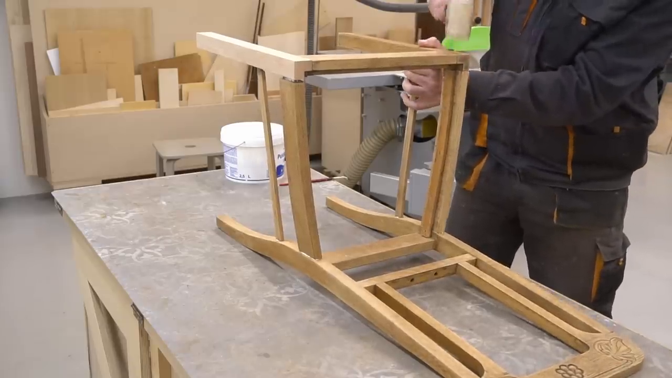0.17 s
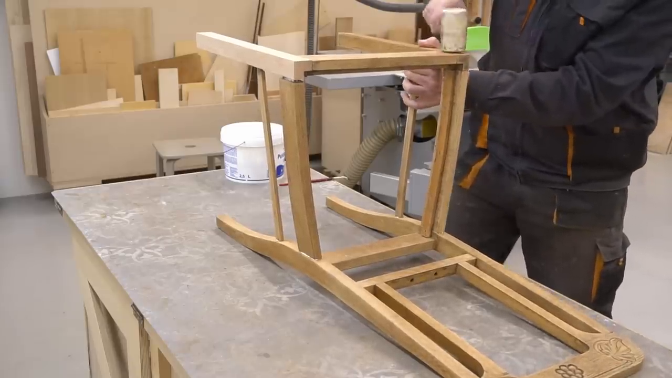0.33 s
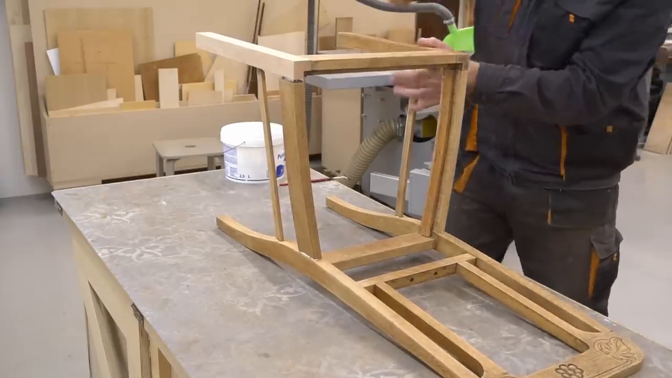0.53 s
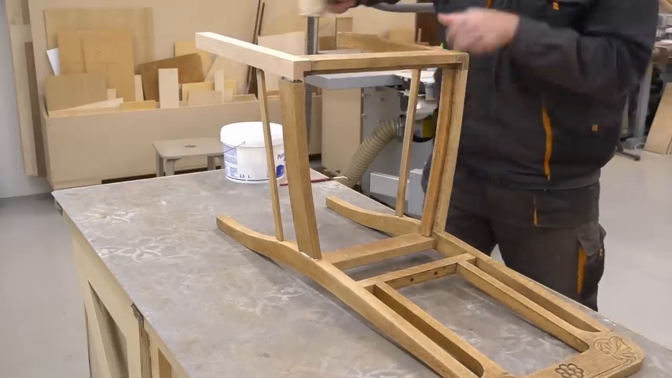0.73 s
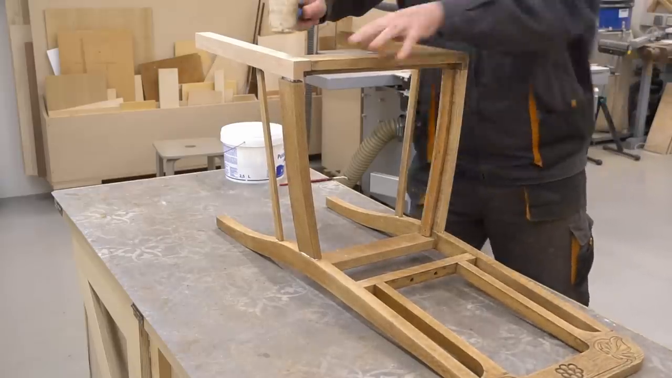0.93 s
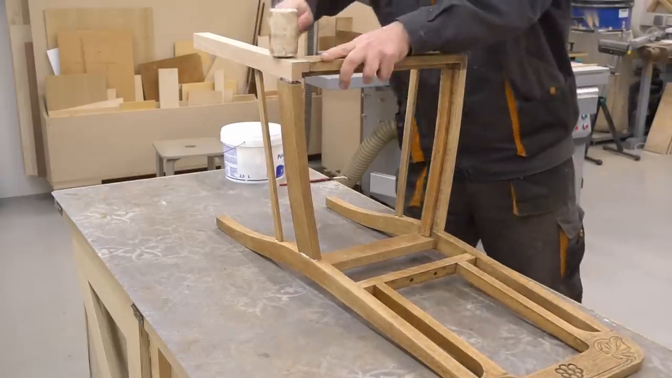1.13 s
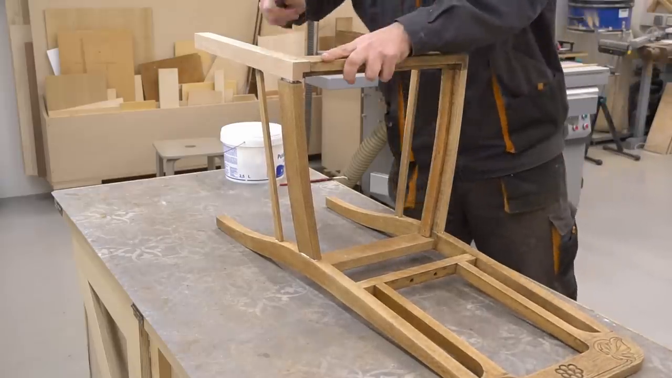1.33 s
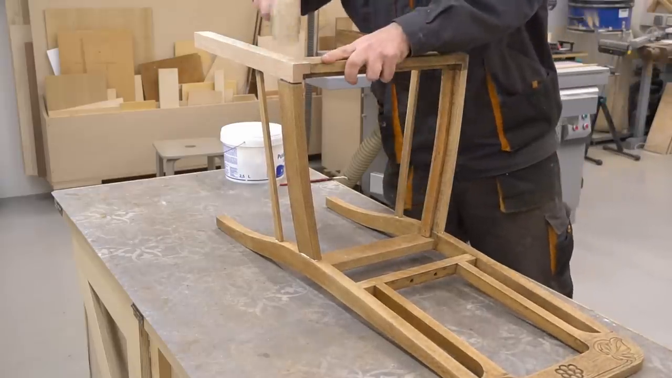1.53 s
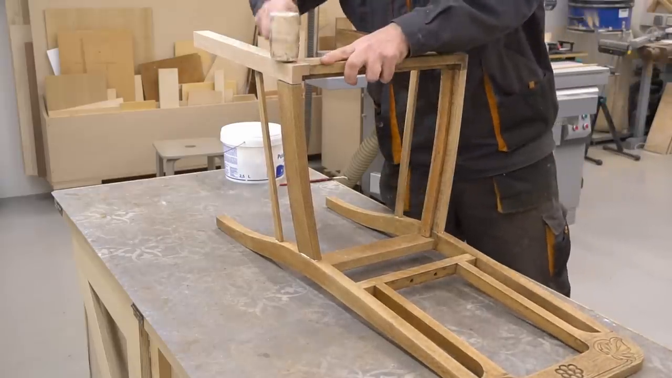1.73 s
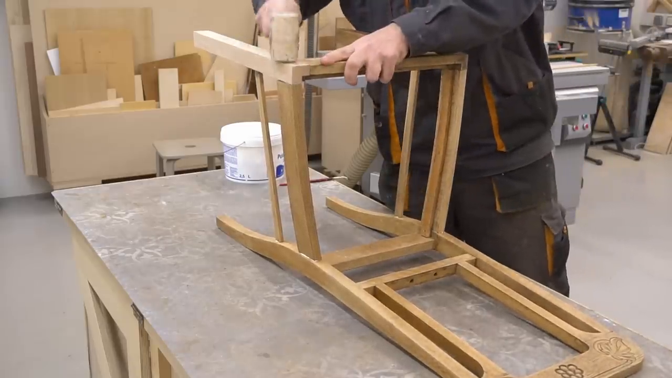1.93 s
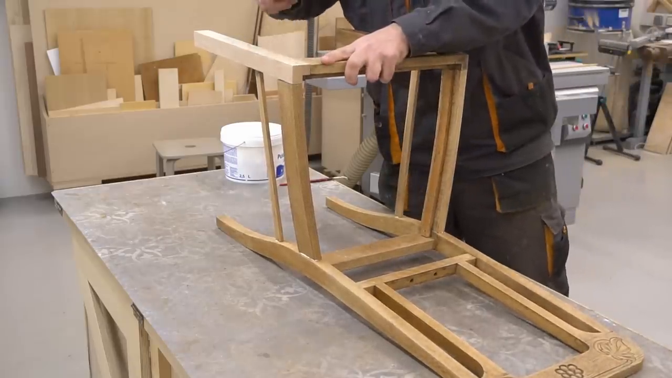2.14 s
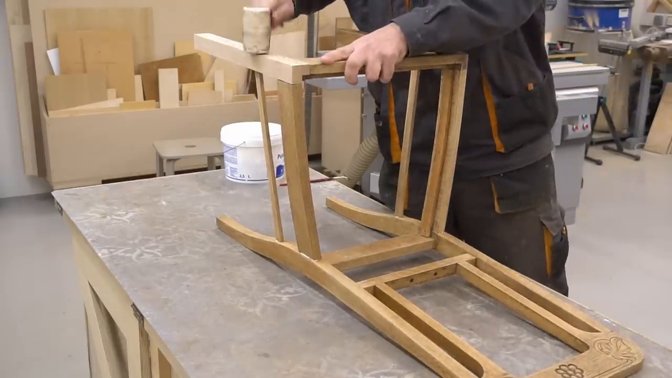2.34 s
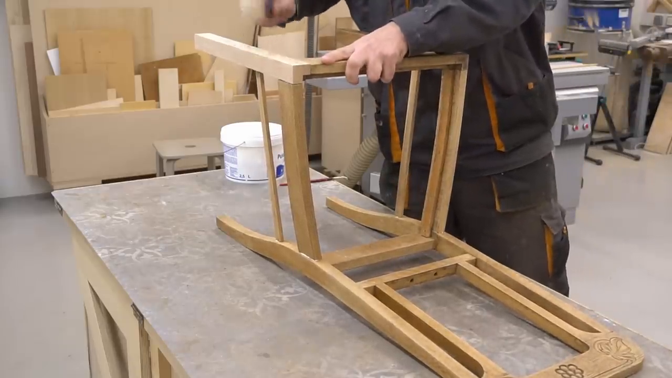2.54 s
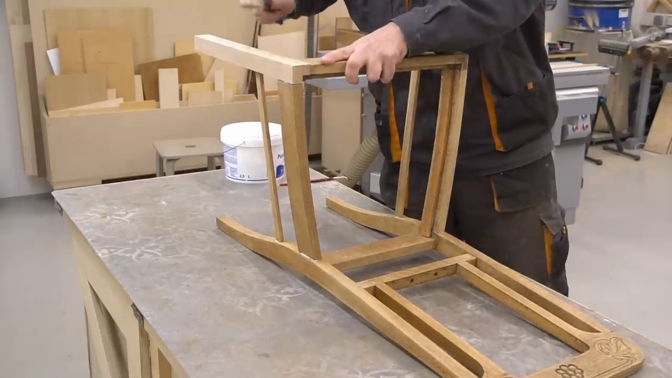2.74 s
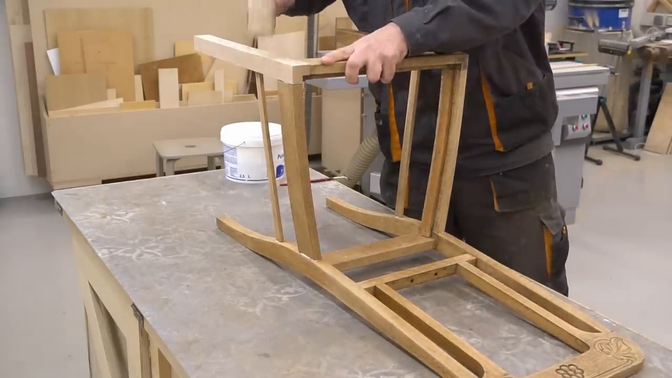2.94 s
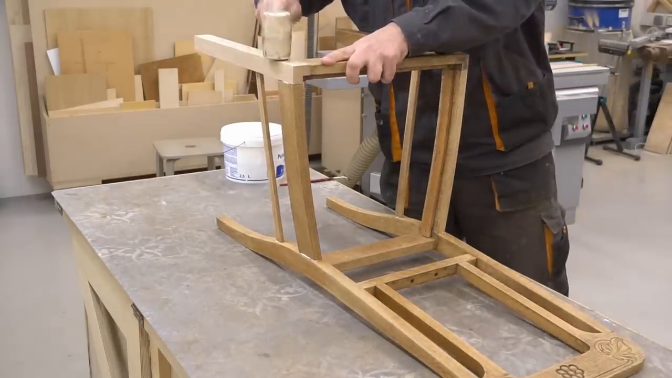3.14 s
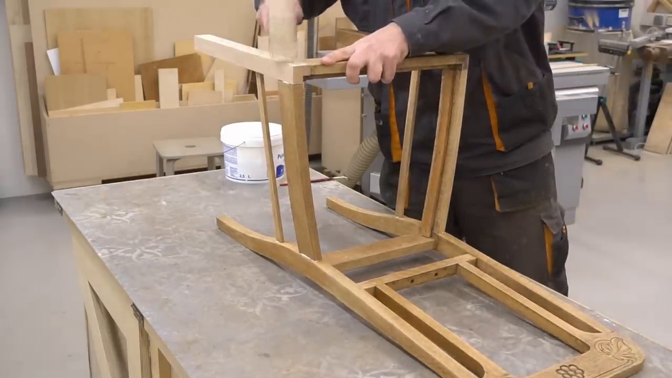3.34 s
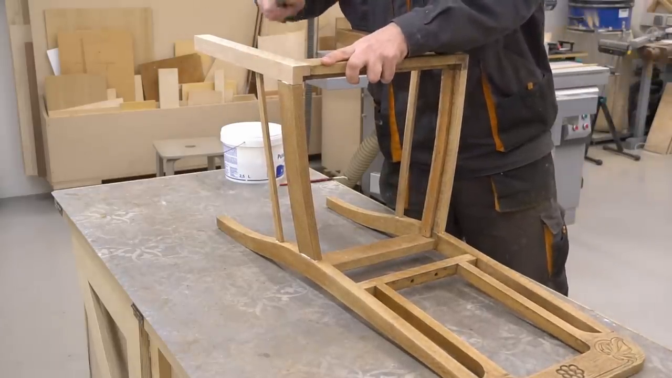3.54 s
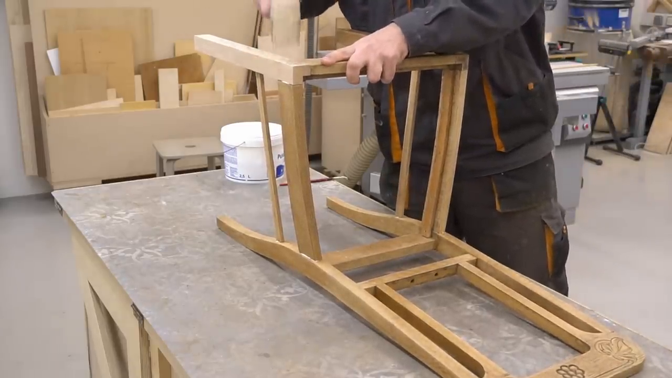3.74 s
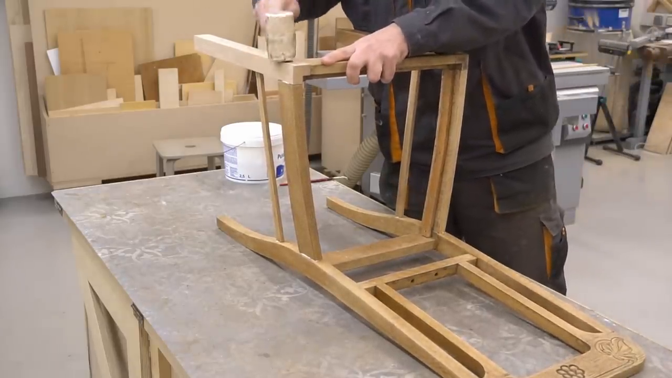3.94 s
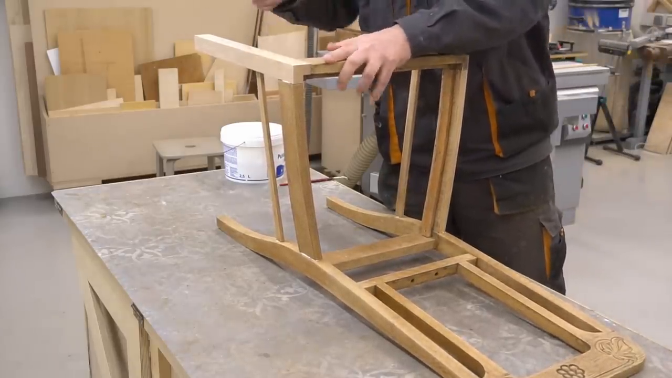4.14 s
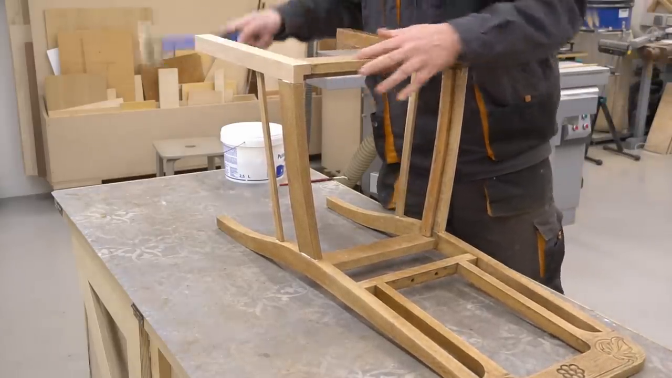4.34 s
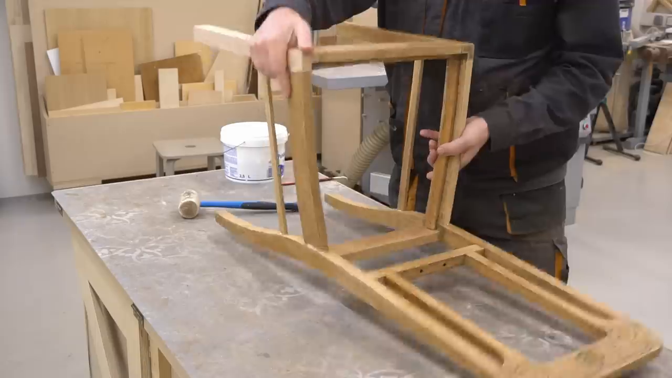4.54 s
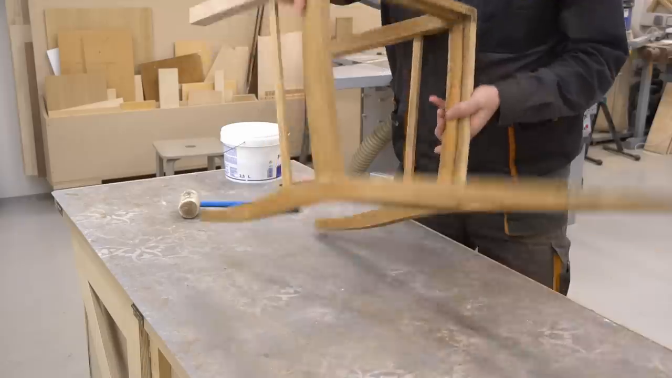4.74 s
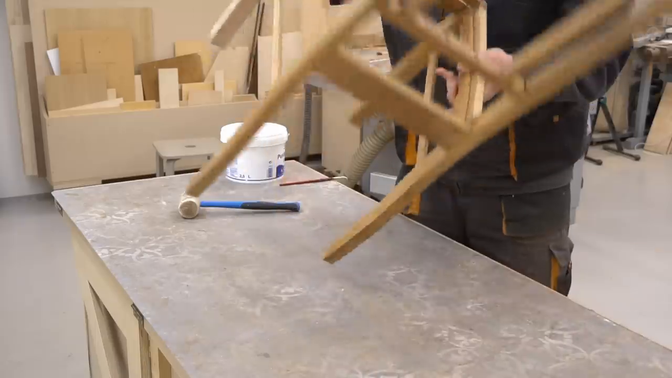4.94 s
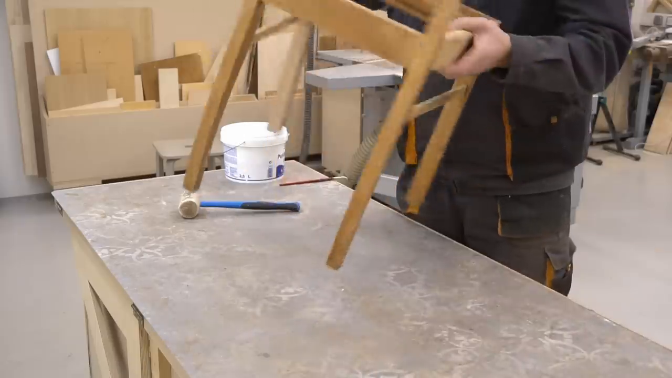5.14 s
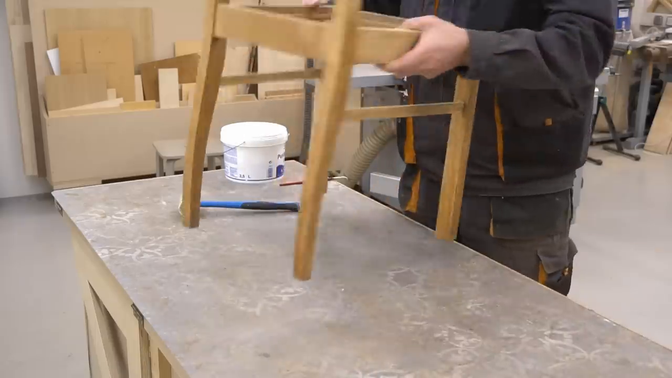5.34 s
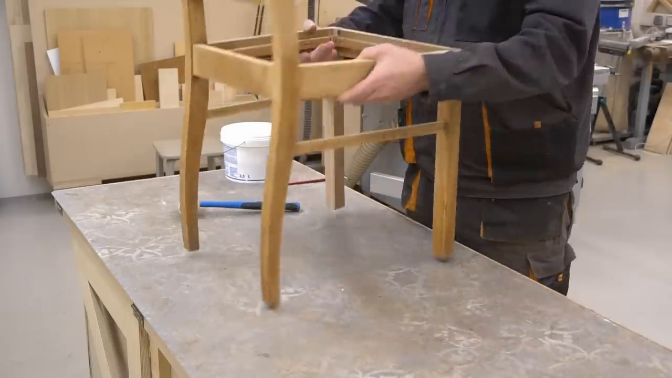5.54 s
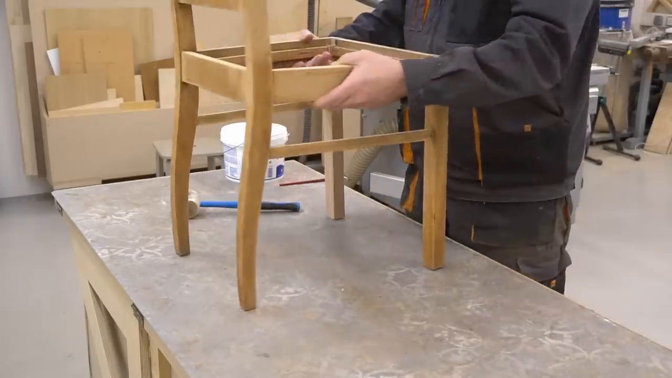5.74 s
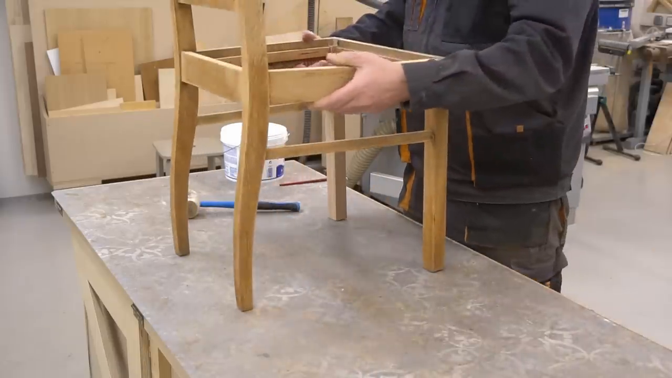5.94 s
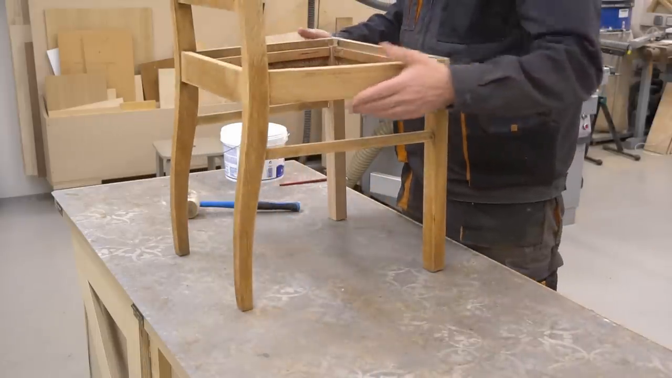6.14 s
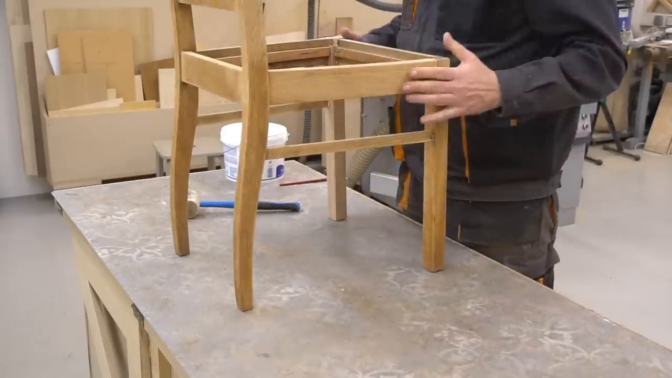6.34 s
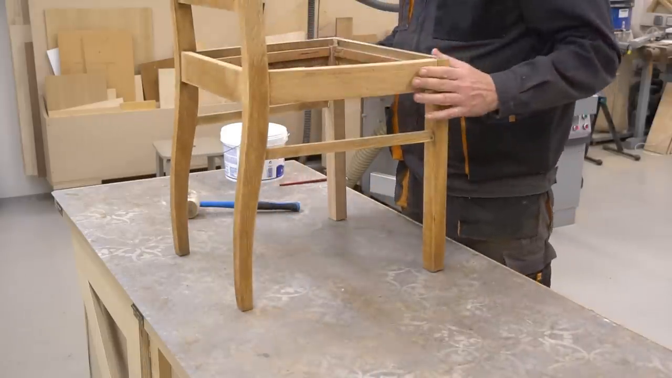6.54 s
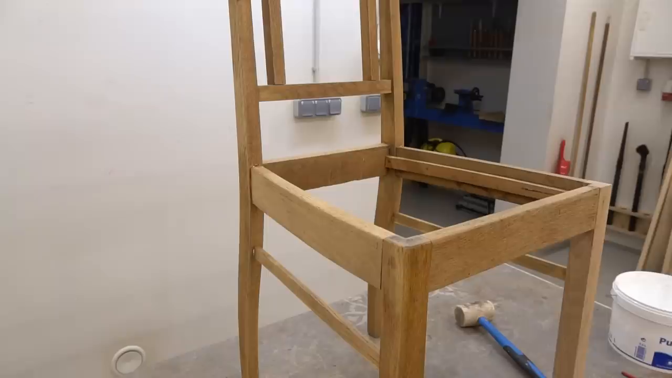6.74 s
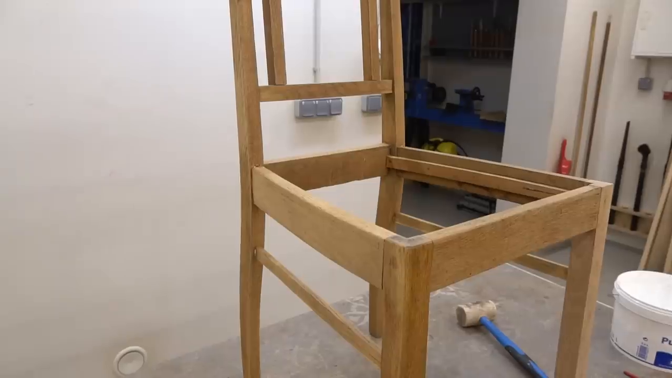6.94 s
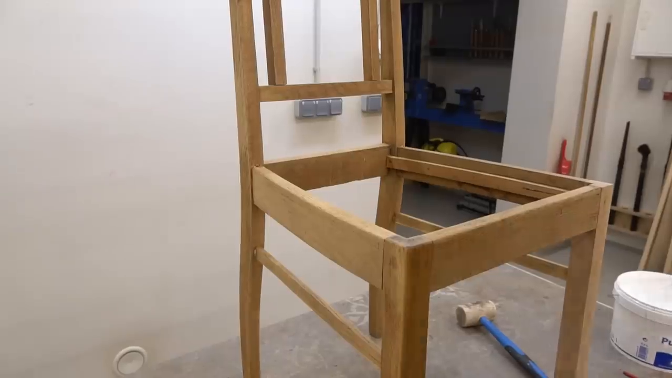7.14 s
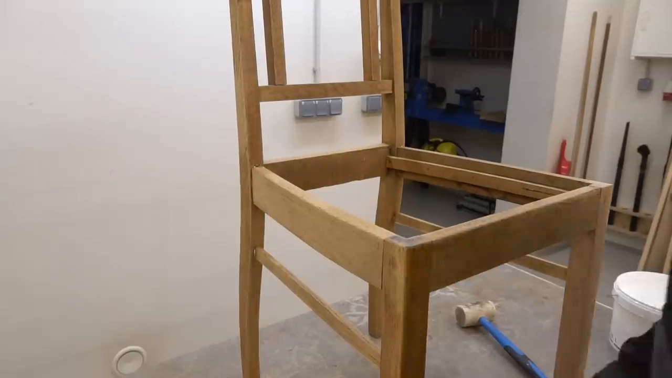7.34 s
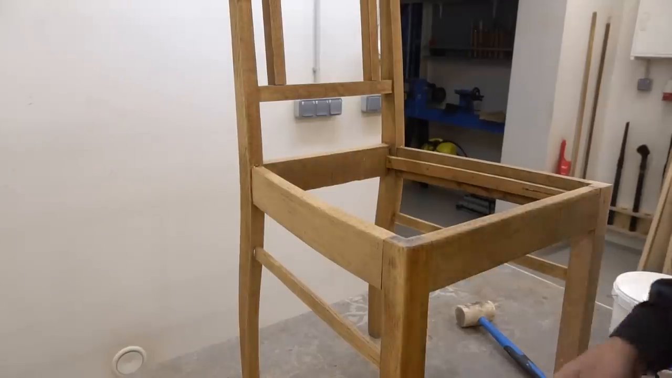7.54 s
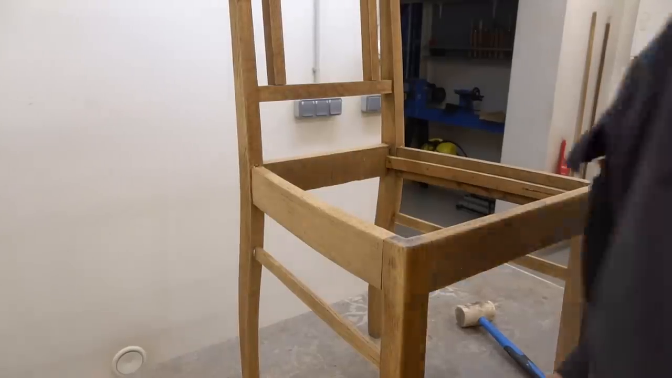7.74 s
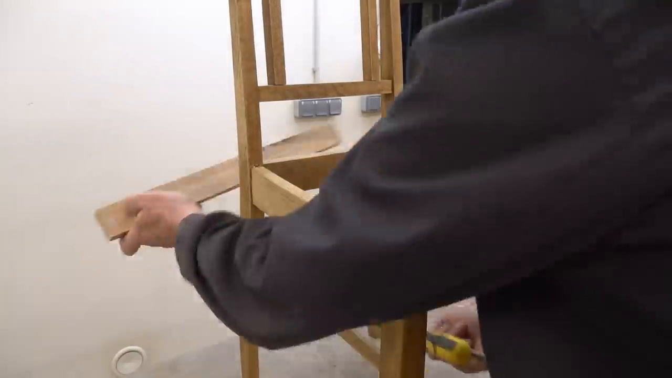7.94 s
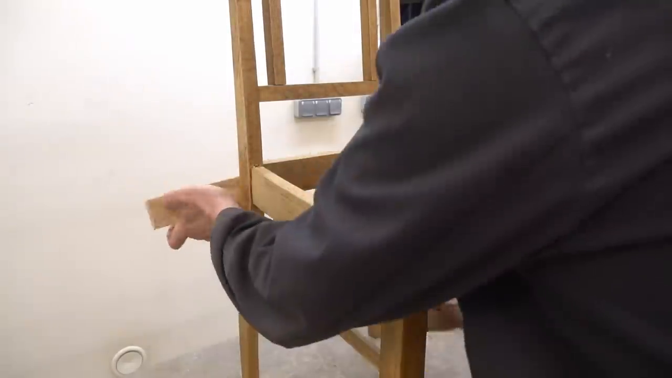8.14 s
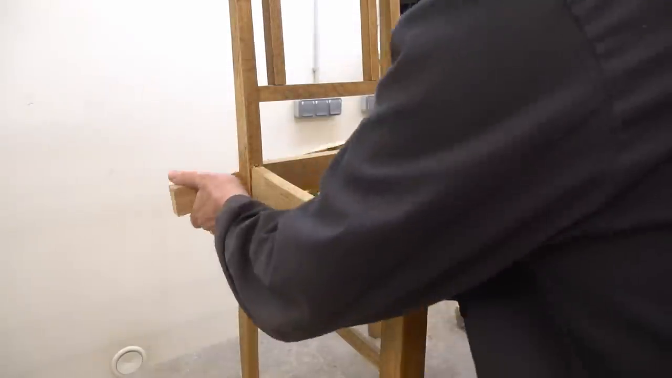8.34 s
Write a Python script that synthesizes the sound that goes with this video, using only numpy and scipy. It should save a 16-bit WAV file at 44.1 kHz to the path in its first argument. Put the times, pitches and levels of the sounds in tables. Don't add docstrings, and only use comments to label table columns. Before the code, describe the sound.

Mallet blows on a chair frame, some way from the microphone, each a sharp crack with hollow wooden ring, bench boom and swelling room echo. Quiet handling follows: a small tick, hand rubbing, faint squeaks and a cluster of leg taps. After a tiny silent cut the sound is near and drier: cloth rustle, soft soles, bright plasticky rattling, then one heavy wood knock, bounce and drag.

```python
import sys
import numpy as np
from scipy import signal
from scipy.fft import rfft, irfft, next_fast_len
from scipy.io import wavfile
from scipy.ndimage import minimum_filter1d

SR = 44100
rng = np.random.default_rng(int(sys.argv[2]) if len(sys.argv) > 2 else 0)


def invert_db(x):
    u = np.asarray(x, float) / 20
    return 10 ** u


def store_wav(level_fs):
    pcm = np.round(np.clip(np.atleast_2d(level_fs), -1, 1) * 32767)
    wavfile.write(sys.argv[1], SR, pcm.T.astype(np.int16))


N = 369979

# start_s, blow_db, crack_db, thud_db, brightness_db
EARLY_BLOW = [
    (-0.14, -13, 1, -7, -14),
]
FAR_BLOWS = [
    (0.107, -18, -10.5, -3.5, 0.5),
    (0.316, -19, -9.5, -0.5, 3.5),
]
TOUCH_BLOW = [
    (1.131, -36.5, -10, 0, -4),
]
RAIL_BLOWS = [
    (1.461, -25.5, -12, -15.5, -6),
    (1.746, -21.5, -10, -2, 1.5),
    (1.984, -26.5, -3.5, 5.5, 1.5),
    (2.321, -24, -5.5, 1, -2),
]
REBOUND_BLOW = [
    (1.498, -21.5, -25, -4, -2),
]
LEG_BLOWS = [
    (2.607, -16, -11, -6.5, -4),
    (2.853, -18, -9, -0.5, -6),
    (3.125, -15.5, -12, -2, -4.5),
    (3.391, -16, -9.5, -1.5, 0),
    (3.658, -23.5, -6, 8, 11),
    (3.894, -23.5, -3, 9, 4.5),
]
LAID_BLOW = [
    (4.507, -36.5, -9, 10.5, 4.5),
]
FEET_BLOWS = [
    (5.62, -42.5, 7, -0.5, 0.5),
    (5.628, -35.5, -6.5, -3, 6.5),
    (5.657, -51, -5, -19, -5.5),
    (5.697, -34.5, 1, -8, 6),
    (5.757, -64, 3, -9, -3),
    (5.787, -36, -5, -19, -3),
]
BATTEN_BLOWS = [
    (7.751, -48, -14.5, -10, -5),
    (8.121, -41.5, -6, -4, 0),
    (8.195, -52, -12, -14, 1),
    (8.219, -17.5, -19, -19, -21),
    (8.225, -13, 7, -9.5, -14),
    (8.264, -28.5, -9, -4, -3),
    (8.294, -47, -16, -4, 26),
    (8.312, -56, 2, -8, -1),
]

# pitch_hz, width_hz, level_db
FAR_RING = [(346, 54, -18), (400, 150, 0.5), (667, 30, 1.5), (907, 120, 2), (1363, 130, 1.5),
            (1834, 400, -2.5)]
TOUCH_RING = [(400, 90, -1), (345, 45, 1), (1410, 126, 4.5), (1730, 400, -1), (3400, 200, -20),
              (4260, 160, -15), (6200, 490, -19)]
RAIL_RING = [(352, 40, -8.5), (416, 40, 0.5), (709, 83, -14), (904, 120, -8), (1137, 81, 0.5),
             (1440, 33, -0.5), (1450, 760, -3), (1905, 320, -18.5), (3990, 170, -18.5)]
LEG_RING = [(342.6, 36, -9), (416, 61, -1), (500, 40, -7.5), (644, 120, -35.5), (818, 350, -8),
            (1170, 30, -18), (1340, 130, -10.5), (1630, 61, -20.5), (2070, 110, -26)]
LAID_RING = [(1425, 100, -5), (2350, 150, 2), (2600, 150, -3), (3810, 190, -9), (5070, 280, -11)]
FEET_RING = [(170, 190, -4), (1200, 42, -25), (1400, 24, -15), (1600, 70, -15.5), (2190, 89, -22.5)]
CASE_RING = [(1950, 130, 1.5), (2960, 78, -24), (3740, 150, -1), (5600, 200, 5), (6250, 280, 6.5),
             (6900, 92, -11.5), (8000, 1100, 4.5), (9600, 140, 4)]
BATTEN_RING = [(433, 34, -4.5), (1039, 22, 7.5), (1640, 29, -5.5), (1796, 110, -13), (2000, 100, 1),
               (1966, 91, -14), (2940, 60, -14), (4090, 80, -23), (5230, 110, -21.5)]
# pitch_hz, width_hz, level_db
FREE_LEG_RING = [(403, 3.3, 43.5), (414, 4.5, 41), (1340, 4.0, 40), (1375, 4.5, 38), (858, 5.5, 38)]

# pitch_hz, level_db
FAR_FAVOURED = [(890, 2.5), (890, 4), (900, 0.5)]
RAIL_FAVOURED = [(1490, -8), (910, 6), (945, 5.5), (880, -1.5)]
LEG_FAVOURED = [(1560, -1.5), (1280, -16.5), (1330, -9.5), (1340, 1), (920, 4.5), (910, -1)]
# blow_s, pitch_hz, width_hz, level_db
WOKEN_MODES = [(-0.14, 1330, 49.3, -5), (0.107, 707, 40, 2), (0.107, 1330, 49.9, -10.5),
               (0.107, 3300, 310, -12), (0.316, 713, 40.2, 0), (0.316, 1290, 50.3, 1.5),
               (0.316, 3360, 90, -14), (0.316, 513, 40, -0.5), (1.461, 916, 60.3, 3.5),
               (1.461, 1680, 40, 7), (1.461, 3000, 252, -4), (1.461, 4300, 90, -11), (1.746, 1310, 70, -5),
               (1.746, 1680, 60, 1), (1.746, 2960, 70, -11), (1.984, 1390, 100, -6), (1.984, 3040, 350, -6),
               (1.984, 3570, 90, -11), (2.321, 765, 38.8, 2.5), (2.321, 1540, 50.3, 2.5),
               (2.321, 2360, 140, -3.5), (2.321, 2820, 61, -4.5), (2.321, 4090, 900, -10),
               (2.607, 725, 49.9, 1), (2.607, 1400, 200, -3), (2.607, 2400, 139.5, -12),
               (2.607, 2820, 59.2, -13.5), (2.607, 4250, 400, -13.5), (2.853, 720, 54.7, 1),
               (2.853, 1340, 35, 4), (2.853, 2300, 121.6, -15.5), (3.125, 910, 100, -2),
               (3.125, 1384, 66, 4), (3.125, 1720, 50, -5.5), (3.125, 2350, 61.7, -5.5),
               (3.391, 1390, 50, -13), (3.391, 1130, 49.6, -1.5), (3.391, 2380, 123, -13),
               (3.391, 3240, 100, -16), (3.658, 1325, 79.5, 6), (3.658, 786, 151, 0),
               (3.894, 1340, 60.3, 2.5), (3.894, 1110, 50, -12), (3.894, 3190, 150, -8.5),
               (3.894, 840, 50.3, 1.5)]

# pitch_hz, level_db (per Hz)
MALLET_COLOUR = [(30, -37.5), (50, -31), (75, -39), (100, -17.5), (200, -16.5), (235, -28), (500, -10),
                 (1200, -3.5), (2000, -10.5), (3000, -14.5), (4400, -17.5), (7000, -23), (11000, -30),
                 (15000, -62.5)]
SPLINTER_COLOUR = [(300, -8), (1100, -4), (2200, -8), (4000, -6), (6500, -17), (11000, -27.5), (15000, -36)]
TOUCH_COLOUR = [(60, -24), (240, -24), (800, -24), (1600, -8), (2600, -19), (6000, -30.5), (11000, -43)]
LAID_COLOUR = [(59, -77), (100, -34), (200, -62), (235, -35), (386, -25.5), (2260, -0.5), (10400, -20.5),
               (11500, -26), (15000, -74), (22000, -120)]
FEET_COLOUR = [(24, -51), (40, -6), (140, 3.5), (417, 0), (670, -20.5), (2190, -16), (9070, -36),
               (10700, -42), (11500, -51), (15000, -83), (22000, -120)]
BATTEN_COLOUR = [(59, -67), (100, -14), (943, -1), (1020, -34), (1430, -6), (1960, 0.5), (10400, -68),
                 (11500, -53), (15000, -81), (22000, -120)]
CASE_COLOUR = [(120, -54), (200, -32), (592, -21.5), (1810, -15.5), (3820, -3.5), (4600, -10.5),
               (5640, -11.5), (10600, -18), (11500, -28), (15000, -57), (22000, -120)]
CLOTH_COLOUR = [(88, -71), (150, -25), (263, -16), (565, -9), (641, -5), (1150, -1.5), (1370, 1.5),
                (3940, 2.5), (10500, -4.5), (11500, -10), (15000, -64), (22000, -120)]
AIR_COLOUR = [(20, -23), (120, -30), (300, -15.5), (600, -19), (900, -8.5), (1200, -10), (1530, -1.5),
              (1800, -12), (4000, -22.5), (8000, -21), (11500, -28.5)]

# start_s, dull_db, bright_db, hold_s, fade_s
HAND_STROKES = [(0.88, -79.5, -79, 0.22, 0.33), (1.1, -91, -76, 0.034, 0.12),
                (4.25, -95, -71.5, 0.12, 0.32), (4.55, -69, -65.5, 0.14, 0.17),
                (4.79, -68, -67.5, 0.04, 0.51), (4.975, -73, -69.5, 0.11, 0.28),
                (5.175, -72, -67.5, 0.047, 0.2), (5.3, -75, -75, 0.057, 1.0),
                (5.81, -58, -55.5, 0.096, 0.27), (5.92, -55.5, -51.5, 0.11, 0.23),
                (6.15, -64.5, -69, 0.077, 1), (6.39, -71, -58.5, 0.1, 0.23), (6.6, -93, -64, 0.12, 0.25),
                (6.74, -82, -61.5, 0.026, 0.04)]
SLEEVE_STROKES = [(6.803, -64.5, -63, 0.011, 0.079), (6.885, -61.5, -54, 0.039, 0.1),
                  (6.97, -60, -62.5, 0.012, 0.17), (7.115, -66, -61, 0.036, 0.091),
                  (7.24, -66, -71, 0.35, 0.37), (7.575, -73, -68, 0.013, 0.059),
                  (7.655, -59, -49, 0.044, 0.068), (7.755, -79, -59.5, 0.017, 0.1),
                  (7.86, -70.5, -67.5, 0.074, 0.63), (7.947, -75, -51.5, 0.026, 0.062),
                  (8.12, -50.5, -58, 0.0083, 0.046), (8.225, -36, -53.5, 0.012, 0.073),
                  (8.27, -69, -52, 0.051, 0.055)]
# start_s, level_db, pitch_hz, width_hz, length_s
SQUEAKS = [(4.75, -73, 2110, 200, 0.15), (4.97, -76, 2900, 200, .06), (5.04, -73, 2920, 250, .05),
           (4.2, -72, 1360, 60, 0.12), (4.2, -76, 900, 60, 0.13), (5.18, -72, 5200, 300, .025),
           (5.858, -53, 300, 160, .018), (7.76, -63, 2960, 70, .04), (1.125, -58, 2500, 3000, .006),
           (5.628, -49, 1400, 302, 0.0089), (5.72, -53, 1500, 500, 0.0074), (5.74, -57, 3000, 500, .008),
           (5.7, -45, 2260, 400, .01), (5.756, -49, 2100, 300, 0.01), (5.783, -57, 1400, 200, .008),
           (5.798, -56, 2000, 600, .012), (6.895, -52.5, 2800, 700, .012), (6.922, -56, 1010, 150, 0.014),
           (6.922, -65, 1700, 200, .012), (7.025, -69, 990, 90, .025), (7.05, -68, 870, 90, 0.042),
           (7.145, -69, 2350, 120, .015), (7.148, -63.5, 633, 120, 0.023), (7.66, -52.5, 2670, 600, 0.061),
           (7.945, -55, 3400, 495, 0.022), (5.645, -44.5, 240, 70.4, 0.017),
           (5.697, -40.5, 330, 160, 0.0073), (5.708, -44, 210, 50, 0.038), (5.788, -46.5, 288, 120, 0.021)]
LOOSE_PARTS = [(7.262, -46, 3300, 500, 0.013), (7.272, -36.5, 3670, 370, 0.009),
               (7.296, -24, 7940, 610, 0.0079), (7.298, -31, 3540, 250, 0.011),
               (7.3, -30, 5630, 200, 0.015), (7.302, -38, 1770, 330, 0.039), (7.34, -43, 1960, 500, 0.029),
               (7.36, -54, 1040, 160, 0.013), (7.387, -38, 6850, 200, .008), (7.386, -40, 3540, 390, 0.011),
               (7.47, -39, 3700, 250, 0.012), (7.488, -37.5, 6440, 300, .008),
               (7.496, -41, 6800, 130, 0.034), (7.497, -49, 7000, 300, 0.011),
               (7.53, -46, 2560, 1900, 0.026), (7.752, -61, 1050, 31, 0.049), (7.76, -59, 1960, 60, 0.045),
               (8.8, -55.5, 2170, 210, 0.057), (8.14, -57, 1950, 60, 0.04), (8.185, -61, 2930, 70, 0.035),
               (8.19, -55, 1800, 200, 0.023), (8.122, -54, 360, 230, 0.059), (8.24, -37, 1050, 50, 0.022),
               (7.2, -65, 2950, 60, 0.055), (8.24, -39, 1400, 200, .02), (8.135, -56, 1036, 30, 0.1),
               (7.43, -52, 6400, 680, .025), (7.41, -51, 3300, 620, .015), (8.262, -36.5, 2100, 120, 0.012),
               (8.265, -50, 4120, 80, 0.06), (8.293, -41, 3000, 440, .008), (8.306, -52, 1036, 35, 0.032),
               (8.31, -51, 2960, 50, 0.05), (8.315, -53, 1570, 70, 0.035), (8.3, -55, 435, 35, 0.07),
               (8.222, -48, 435, 45, 0.055), (8.228, -41, 2700, 300, .012)]
# start_s, peak_db, floor_pitch_hz
FOOTFALLS = [
    (6.815, -64, 302),
    (7.15, -63, 400),
    (7.285, -64, 190),
    (7.54, -75, 99),
    (7.679, -67, 182),
    (7.747, -64, 137),
    (8.121, -57, 206),
    (8.13, -62, 75),
]
# start_s, peak_db, length_s
CASE_JOLTS = [
    (7.277, -29, 0.032),
    (7.302, -17.5, 0.025),
    (7.386, -29.5, 0.015),
    (7.412, -39, 0.012),
    (7.468, -34, 0.01),
    (7.488, -29.5, 0.019),
    (7.527, -49, 0.026),
]
# start_s, level_db, hold_s, fade_s
CASE_SWINGS = [
    (7.315, -31, 0.027, 0.039),
    (7.377, -49, 0.075, 0.24),
    (7.508, -44.5, 0.026, 0.049),
]
BATTEN_DRAGS = [
    (7.755, -56, 0.068, 0.066),
    (8.125, -60, 0.032, 0.12),
    (8.242, -40.5, 0.074, 0.049),
]

# pitch_hz, t60_s
ROOM_DECAY = [(100, 0.56), (290, 0.66), (424, 0.54), (600, 0.62), (850, 0.62), (1200, 0.64), (1840, 0.63),
              (4850, 0.62), (10000, 0.49)]
# pitch_hz, share
NEAR_WALL_ECHO = [(600, 0.05), (1500, 0.18), (3000, 0.33), (5000, 0.32), (9000, 0.18)]
# pitch_hz, likeness
STEREO_LIKENESS = [(60, 0.95), (270, 0.98), (580, 0.89), (1220, 0.7), (2600, 0.47), (5500, 0.17),
                   (11000, 0.05)]

PAD = 8820
LONG = next_fast_len(N + PAD + SR)
SHORT = 8192
TIME = (np.arange(LONG) - PAD) / SR
HZ = np.maximum(np.arange(LONG // 2 + 1) * SR / LONG, 1)


def at_hz(points, hz):
    points = np.array(points)
    return np.interp(np.log(hz), np.log(points[:, 0]), points[:, 1])


def noise(spectrum, low_hz=10, high_hz=20000):
    mid, side = rfft(rng.standard_normal((2, LONG))) * invert_db(at_hz(spectrum, HZ))
    keep = 1 / np.sqrt((1 + (low_hz / HZ) ** 6) * (1 + (HZ / high_hz) ** 6))
    alike = np.clip(at_hz(STEREO_LIKENESS, HZ), 0, 1)
    pair = np.sqrt(1 + alike) * mid + np.sqrt(1 - alike) * side * [[1], [-1]]
    out = irfft(keep * pair, LONG)
    return out / np.sqrt(np.mean(out ** 2))


def clicks(times, db):
    out = np.full(LONG, 1e-18)
    out[np.round(np.asarray(times) * SR).astype(int) + PAD] = invert_db(db)
    return out


def lag(x, seconds):
    r = np.exp(-1 / (max(seconds, 1e-5) * SR))
    return signal.lfilter([1 - r], [1, -r], x)


def resonate(x, hz, width_hz):
    r = np.exp(-np.pi * max(width_hz, 2.2) / SR)
    top = np.array([1, 0, -1]) * (1 - r * r) / 2
    return signal.lfilter(top, [1, -2 * r * np.cos(2 * np.pi * hz / SR), r * r], x)


def flicker(per_s, depth_db):
    knots = rng.standard_normal(12000)
    return invert_db(depth_db * np.interp((TIME - TIME[0]) * per_s, np.arange(len(knots)), knots))


def strokes(s, peak_db, hold_s, fade_s, rise):
    t = TIME[::64, None] - s
    away = np.maximum(np.maximum(t - hold_s, -t / rise) / fade_s, 0)
    power = invert_db(peak_db - 20 * away) ** 2
    return np.interp(TIME, TIME[::64], np.sqrt(power.sum(axis=1)))


def causal(power):
    cepstrum = irfft(np.log(power) / 2, SHORT)
    cepstrum[1:SHORT // 2] *= 2
    cepstrum[SHORT // 2 + 1:] = 0
    return irfft(np.exp(rfft(cepstrum)), SHORT)


def air():
    return invert_db(-77.5) * noise(AIR_COLOUR)


def struck_wood(rows, modes, colour, ring_db, tick_db, favours=(), thud_hz=600):
    hz = np.maximum(np.arange(SHORT // 2 + 1) * SR / SHORT, 1)
    scatter = rng.standard_normal((len(rows), len(modes)))
    body = np.zeros(LONG)
    for k, (s, blow_db, _, thud_db, bright_db) in enumerate(rows):
        ringing = [(mode_hz, max(width_hz, 45), db) for mode_hz, width_hz, db in modes]
        ringing += [(mode_hz, 95, db) for mode_hz, db in favours[k:k + 1]]
        ringing += [row[1:] for row in WOKEN_MODES if abs(row[0] - s) < .05]
        lucks = [*scatter[k], *np.zeros(len(ringing))]
        power = invert_db(at_hz(colour, hz) + tick_db) ** 2
        for (mode_hz, width_hz, mode_db), luck in zip(ringing, lucks):
            off = (hz - mode_hz ** 2 / hz) / max(width_hz, 25, .1 * mode_hz - 100)
            power = power + (invert_db(mode_db + ring_db + 3 * luck) / (1 + off ** 2)) ** 2
        tone_db = thud_db / (1 + (hz / thud_hz) ** 4) + bright_db / (1 + (2500 / hz) ** 2)
        at = round(s * SR) + PAD
        body[at:at + SHORT] += causal(power * invert_db(blow_db + tone_db) ** 2)
    return body


def joint_crack(rows, colour, crack_db, crack_s, low_hz):
    s, blow_db, snap_db, _, bright_db = np.transpose(rows)
    level_db = blow_db + snap_db + crack_db
    seated_s = s + 1.81 * crack_s
    sliding = np.cumsum(clicks(s, level_db) - clicks(seated_s, level_db))
    burst = invert_db(-7.0) * lag(lag(sliding, 0.0011), 0.0011)
    edge = clicks(s, level_db - 5.5 + bright_db)
    edge = lag(lag(edge, crack_s), 0.0013) * crack_s * SR
    hiss = noise(colour, low_hz=low_hz)
    direct = .5 * (hiss + hiss.mean(axis=0))
    return burst * direct + edge * np.diff(direct, prepend=0)


def knocks(rows, modes, colour, ring_db, tick_db, crack_db, crack_s, splinter=None, favours=(), thud_hz=600):
    body = struck_wood(rows, modes, colour, ring_db, tick_db, favours, thud_hz)
    crack = joint_crack(rows, splinter or colour, crack_db, crack_s, thud_hz)
    return np.array([body * [[1], [1]], crack])


def mallet_and_chair():
    far = list(EARLY_BLOW) + list(FAR_BLOWS)
    mallet = dict(colour=MALLET_COLOUR, splinter=SPLINTER_COLOUR)
    return (knocks(far, FAR_RING, favours=FAR_FAVOURED, ring_db=31.0, tick_db=31.5,
                   crack_db=13.5, crack_s=0.0034, **mallet)
            + knocks(RAIL_BLOWS, RAIL_RING, favours=RAIL_FAVOURED, ring_db=34.0, tick_db=36.5,
                     crack_db=12.5, crack_s=0.0051, **mallet)
            + knocks(LEG_BLOWS, LEG_RING, favours=LEG_FAVOURED, ring_db=31.5, tick_db=31.5,
                     crack_db=8.5, crack_s=0.0055, **mallet)
            + knocks(TOUCH_BLOW, TOUCH_RING, TOUCH_COLOUR, ring_db=27.0, tick_db=31.5,
                     crack_db=10.5, crack_s=0.0023)
            + knocks(LAID_BLOW, LAID_RING, LAID_COLOUR, ring_db=27.5, tick_db=23.0,
                     crack_db=6.5, crack_s=0.0069)
            + knocks(FEET_BLOWS, FEET_RING, FEET_COLOUR, ring_db=37.5, tick_db=33.0,
                     crack_db=-3, crack_s=0.0057))


def scattered(body):
    t = np.arange(512) / SR / 0.004
    smear = rng.standard_normal(len(t)) * t * np.exp(-t ** 2)
    smear = smear / np.sqrt(np.sum(smear ** 2))
    return invert_db(-7.5) * signal.fftconvolve(body[0], smear)[:LONG]


def bench():
    mallet = list(EARLY_BLOW) + list(FAR_BLOWS) + list(RAIL_BLOWS) + list(LEG_BLOWS)
    s, blow_db, _, thud_db, _ = np.transpose(mallet + list(TOUCH_BLOW))
    boom = clicks(s, blow_db + thud_db + 22.5 + 16.5)
    for stage in range(3):
        boom = resonate(boom, hz=137.5, width_hz=13.1)
    s, blow_db, _, thud_db, _ = np.transpose(mallet)
    blows = clicks(s, blow_db + thud_db)
    return boom + sum(invert_db(db) * resonate(blows, hz, width_hz) for hz, width_hz, db in FREE_LEG_RING)


def workshop(x):
    white = rfft(noise([(20, 0.04), (20000, 0.0024)])[:, :SR])
    t = np.arange(SR) / SR
    half_octave = 2 * np.log2(np.maximum(np.arange(SR // 2 + 1), 1) / 53)
    response = 0
    for k in range(18):
        hz = 53 * 2 ** (k / 2)
        rise = 1 - np.exp(-(t / (0.018 + 0.56 / hz)) ** 2)
        rise = rise * (1 + max(at_hz(NEAR_WALL_ECHO, hz), 0) * np.exp(-(t / 0.11) ** 2))
        share = np.clip(1 - abs(half_octave - k), 0, 1)
        decay = invert_db(-60 * t / at_hz(ROOM_DECAY, hz))
        response = response + irfft(white * share, SR) * rise * decay
    response = response / np.sqrt(SR)
    return irfft(rfft(x.mean(axis=0)) * rfft(response, LONG), LONG)


def rubbing():
    palms = HAND_STROKES, 0.4, 0.85
    sleeves = SLEEVE_STROKES, 0.23, 1.02
    dull = bright = 0
    for rows, rise, linger in (palms, sleeves):
        s, dull_db, bright_db, hold_s, fade_s = np.transpose(rows)
        dull = dull + strokes(s, dull_db, hold_s, linger * fade_s, rise / linger)
        bright = bright + strokes(s, bright_db, hold_s, fade_s, rise)
    dull = dull * noise(CLOTH_COLOUR, high_hz=2200) * flicker(40, depth_db=1.2)
    return dull + bright * noise(CLOTH_COLOUR, low_hz=2200) * flicker(60, depth_db=1.2)


def squeaks_and_chinks(rows):
    out = np.zeros((2, LONG))
    t = np.arange(SHORT) / SR
    for s, db, hz, width_hz, length_s in rows:
        width_hz = max(width_hz, 30)
        mid, side = rng.standard_normal((2, SHORT))
        rough = mid + min(hz / 1500, 1) * side * np.array([[1], [-1]])
        rub = np.minimum(t / 0.0016, 1) * np.exp(-(t / length_s) ** 2) * rough
        at = round(s * SR) + PAD
        out[:, at:at + SHORT] += invert_db(db) * np.sqrt(SR / width_hz / np.pi) * resonate(rub, hz, width_hz)
    return out


def rebound():
    return struck_wood(REBOUND_BLOW, RAIL_RING, MALLET_COLOUR, ring_db=30.5, tick_db=35.5)


def steps():
    white, out = rng.standard_normal(LONG), 0
    for s, peak_db, hz in FOOTFALLS:
        puff = lag(lag(clicks([s], peak_db + 28.5), 0.017), 0.011) * 0.017 * SR
        out = out + resonate(resonate(puff * white, hz, .5 * hz), hz, .5 * hz)
    return out


def tape_case():
    grain = noise(CASE_COLOUR) * flicker(900, depth_db=2.5)
    swung = grain * invert_db(-3.5) * strokes(*np.transpose(CASE_SWINGS), rise=1)
    scatter = rng.standard_normal((len(CASE_JOLTS), len(CASE_RING)))
    jolts = []
    for s, db, length_s in CASE_JOLTS:
        t = TIME - s - .003
        width_s = np.where(TIME < s + .003, 0.42, .7) * length_s
        jolts.append(invert_db(db - 15.5) * np.exp(-(t / width_s) ** 2))
    hollow = 0
    for (hz, width_hz, mode_db), luck in zip(CASE_RING, scatter.T):
        drive = .18 * swung + grain * (invert_db(4 * luck) @ jolts)
        hollow = hollow + invert_db(mode_db + 6) * resonate(drive, hz, max(width_hz, 60))
    return swung + grain * sum(jolts) + hollow


def batten_knocks():
    return knocks(BATTEN_BLOWS, BATTEN_RING, BATTEN_COLOUR, ring_db=42, tick_db=16,
                  crack_db=-25.0, crack_s=0.021, thud_hz=1230).sum(axis=0)


def batten_drag():
    scratch = noise([(300, -18), (1000, -13), (4000, 15), (11000, -3.0)])[0]
    drag = strokes(*np.transpose(BATTEN_DRAGS), rise=0.44) * scratch * flicker(150, depth_db=4.0)
    return sum(invert_db(db + 12.5) * resonate(drag, hz, max(width_hz, 25)) for hz, width_hz, db in BATTEN_RING)


def scene_change():
    change_s, fade_out_s, fade_in_s = 6.781, .007, .02
    dip = np.maximum((change_s - TIME) / fade_out_s, (TIME - change_s) / fade_in_s)
    return np.clip(dip, 0, 1) ** 3


def scene():
    body, snap = mallet_and_chair()
    near = batten_knocks() + batten_drag() + tape_case() + steps()
    near[0] = np.roll(near[0], 30)
    wet = workshop(invert_db(23.0) * body + invert_db(2.5) * snap + invert_db(-3.5) * near)
    grainy = snap * flicker(2900, depth_db=2.0)
    grainy = grainy - lag(grainy, 0.00092)
    small = squeaks_and_chinks(LOOSE_PARTS) + squeaks_and_chinks(SQUEAKS)
    small_wet = workshop(invert_db(-8) * small + invert_db(22.5) * rebound())
    whole = grainy + scattered(body) + bench() + near + wet + rubbing() + small + small_wet + air()
    return (whole * scene_change())[:, PAD:PAD + N]


def top_cut(x):
    return signal.sosfilt(signal.butter(12, 12330, fs=SR, output="sos"), x)


def record(dry):
    t = np.arange(N) / SR
    peak = -minimum_filter1d(-abs(dry).max(axis=0), size=200)
    over_db = np.maximum(20 * np.log10(peak + 1e-9) + 22, 0)
    release_db = 240 * t
    held_db = np.maximum.accumulate(over_db + release_db) - release_db
    limited = dry * invert_db(-.9 * lag(held_db, 0.016))
    low_pass = signal.cheby2(14, 50, 11676, fs=SR, output="sos")
    finished = signal.sosfilt(low_pass, limited)
    return top_cut(finished)


dry = scene()
out = record(dry)
store_wav(out)
```